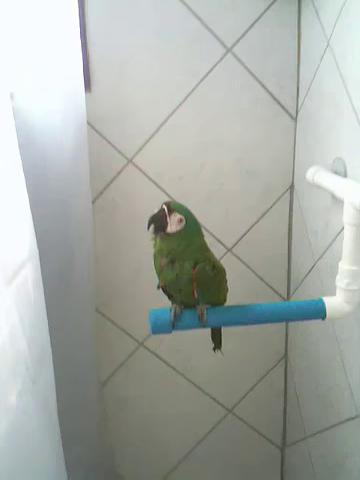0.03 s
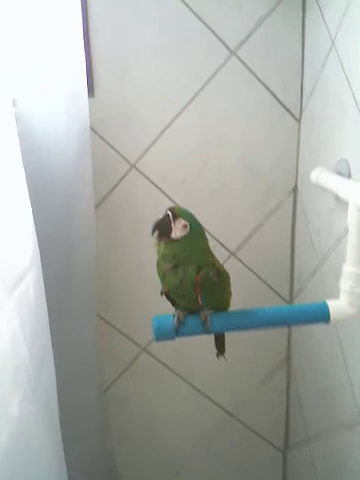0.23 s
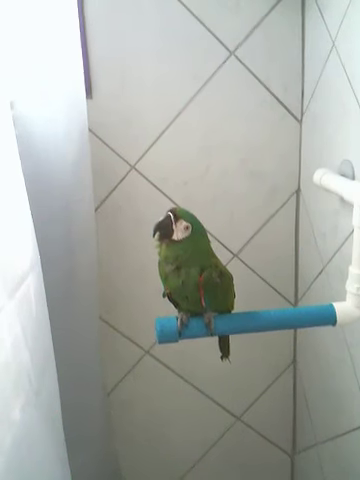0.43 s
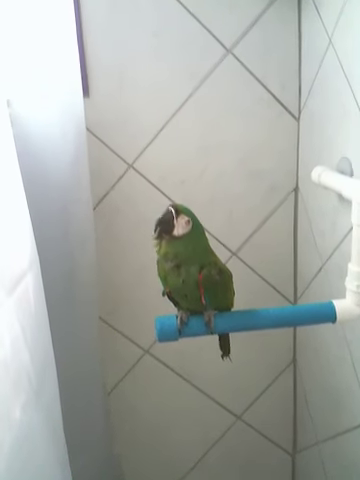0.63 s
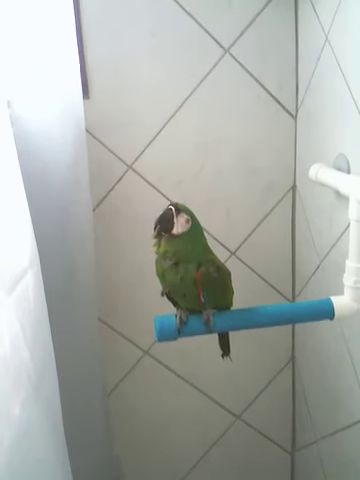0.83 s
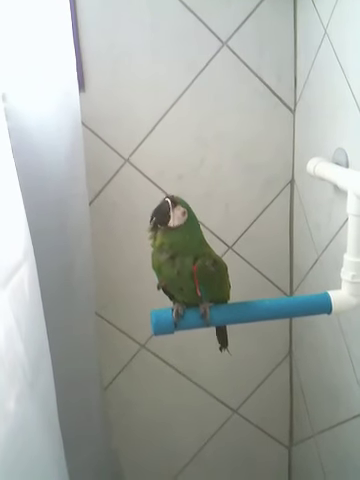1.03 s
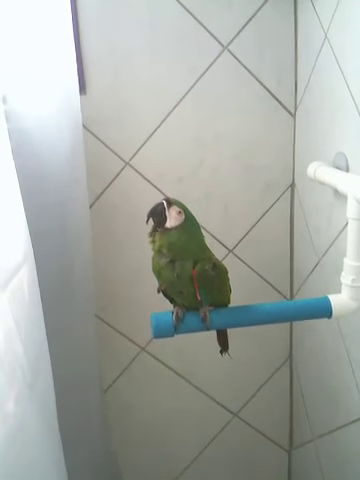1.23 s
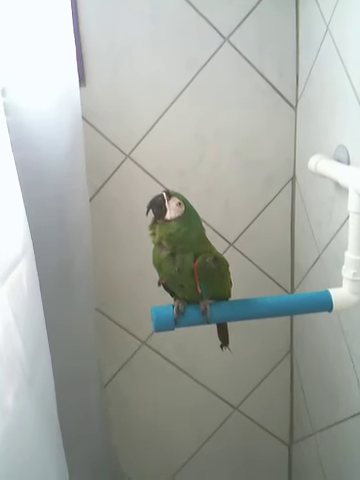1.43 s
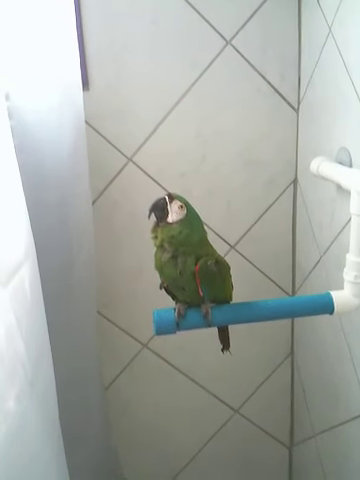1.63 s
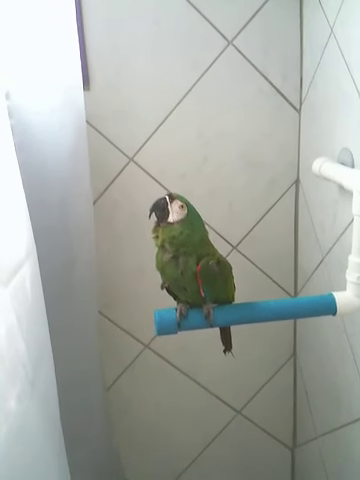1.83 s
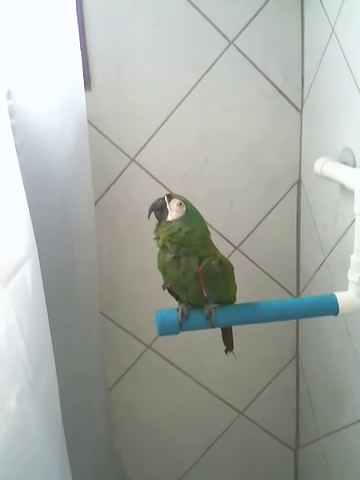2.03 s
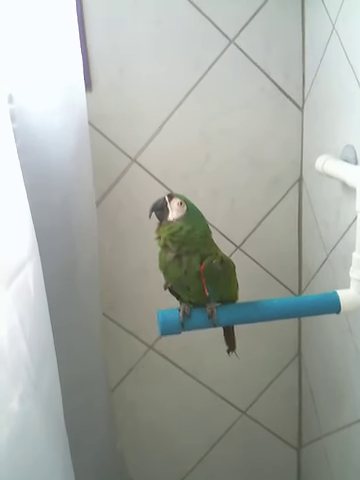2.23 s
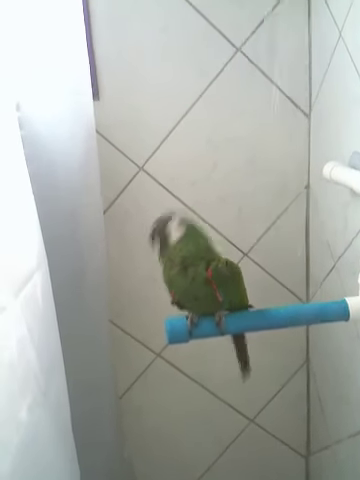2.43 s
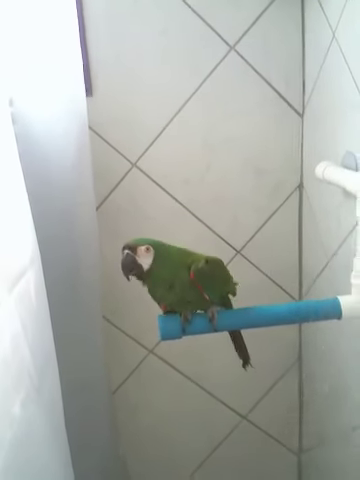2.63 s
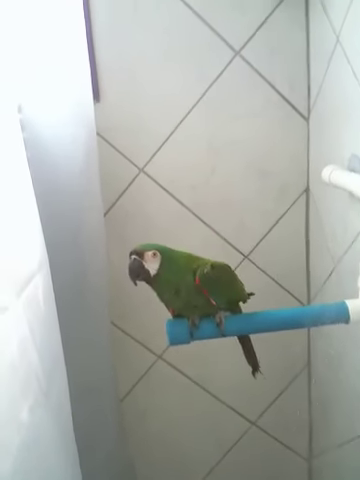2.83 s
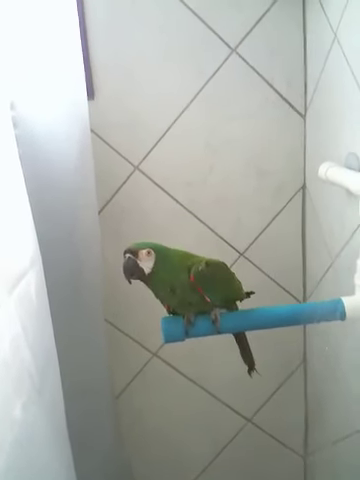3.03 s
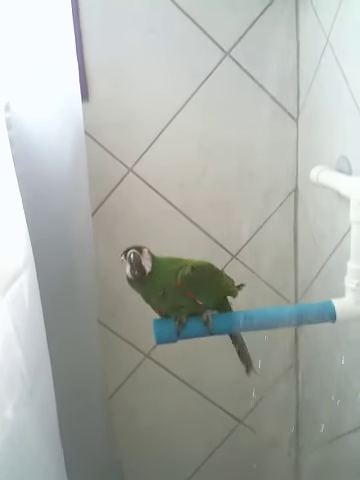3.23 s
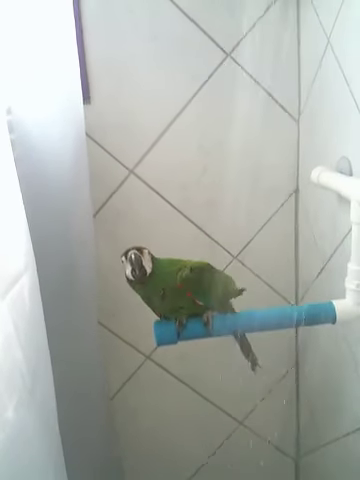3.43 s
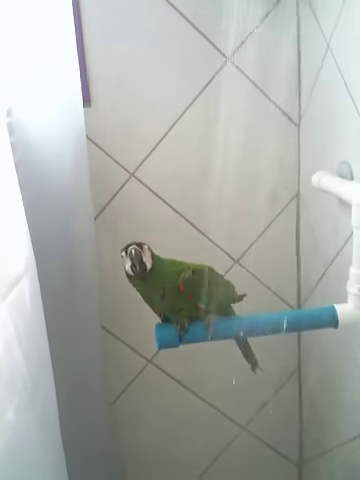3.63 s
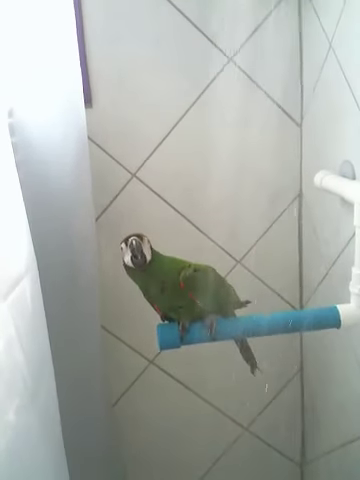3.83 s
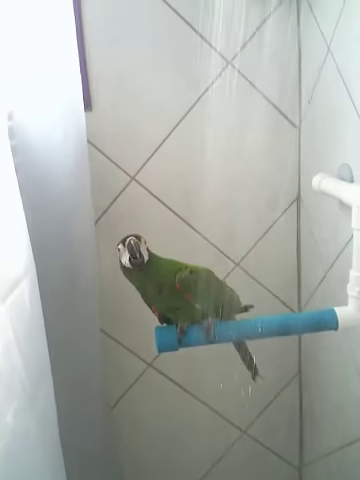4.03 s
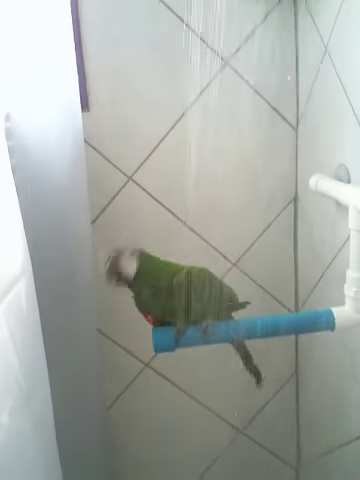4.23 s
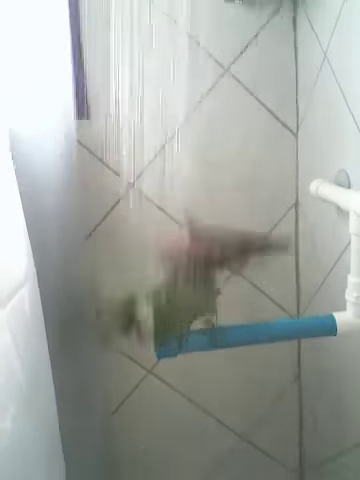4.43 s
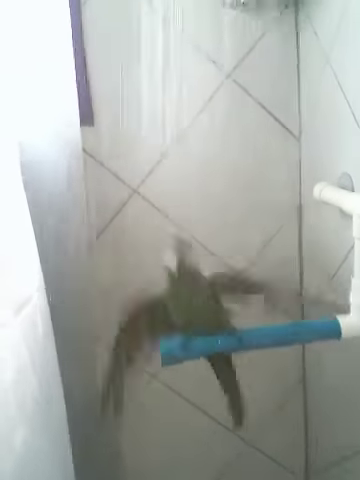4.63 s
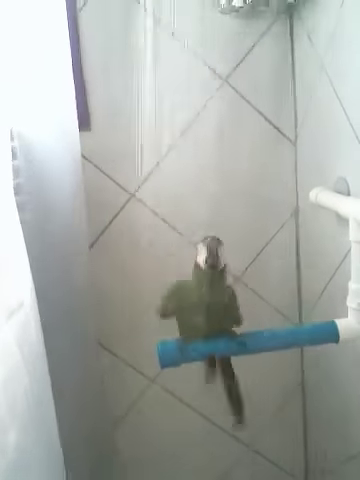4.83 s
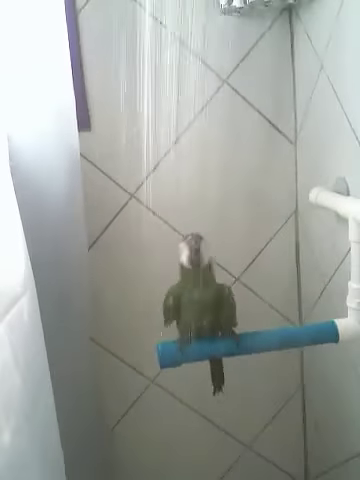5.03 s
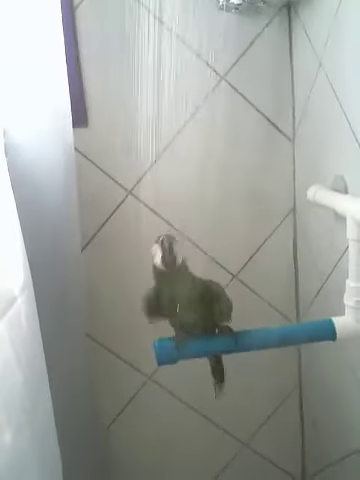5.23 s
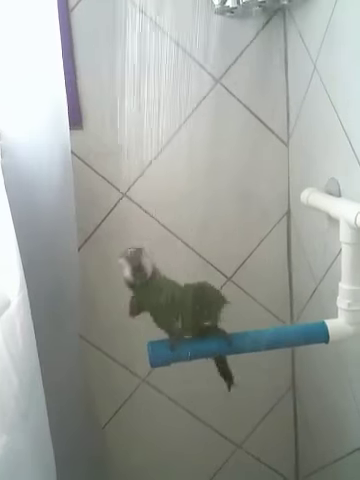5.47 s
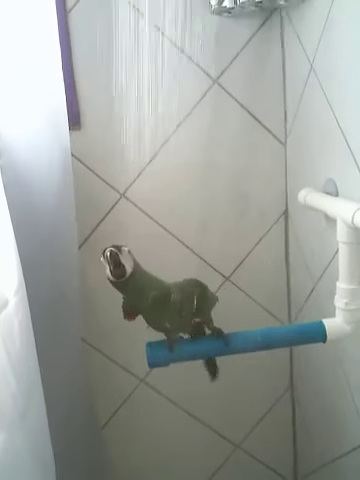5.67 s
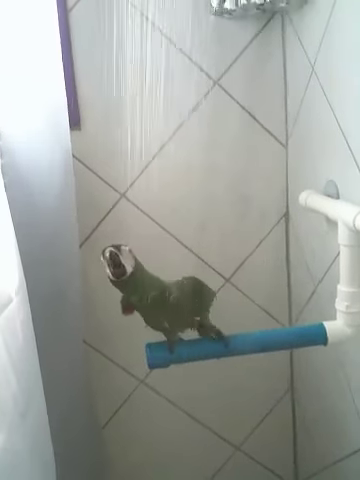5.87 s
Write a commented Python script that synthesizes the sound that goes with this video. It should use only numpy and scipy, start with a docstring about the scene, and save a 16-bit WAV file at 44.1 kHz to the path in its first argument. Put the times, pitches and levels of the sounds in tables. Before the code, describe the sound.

Steady shower spray with a gurgling drain and faint hum, broken by four loud snaps and a bird's wet wing flurry, ending softer.

```python
"""A shower runs in a small tiled bathroom: fine drops hiss, patter on the wall and gurgle in the drain, faintly humming.
The jets swing onto the near wall and patter harder, and the stiff shower head snaps as it is swivelled.
The spray lulls briefly, wet feathers swish, the head snaps twice more and a perched parrot beats its wings.
The spray turns softer as it lands on feathers instead of tiles.
Filtered random impacts make the water; decaying noise and sines make the cracks; swelling noise makes the wings."""
import sys
import numpy as np
from scipy import signal
from scipy.fft import rfft, irfft, next_fast_len
from scipy.io import wavfile

SR = 44100
rng = np.random.default_rng(int(sys.argv[2]) if len(sys.argv) > 2 else 0)


def digitize_waveform(pressure):
    """Quantize a signal to 16-bit integers and store it at the path in sys.argv[1].

    Rows of a 2-D input are taken as channels; values are limited to [-1, 1].
    """
    field = np.atleast_2d(pressure).T
    bounded = np.clip(field, -1, 1)
    quanta = np.round(bounded * 32767).astype(np.int16)
    wavfile.write(sys.argv[1], SR, quanta)


N = 260190
TIME = np.arange(N) / SR


def from_db(db):
    """Decibels to gain."""
    return 10 ** (np.asarray(db) / 20)


def rms_one(x):
    """Scale to an rms of 1."""
    return x / np.sqrt(np.mean(x ** 2) + 1e-20)


def in_time(rows):
    """Each column of a (time, value, ...) curve, sample by sample."""
    s, *columns = np.transpose(rows)
    return [np.interp(TIME, s, c) for c in columns]


def drift(rate_hz):
    """Random values, `rate_hz` a second, joined by straight lines; rms 1."""
    steps = rng.standard_normal(4096)
    return rms_one(np.interp(TIME * rate_hz, np.arange(len(steps)), steps))


def coloured(x, spectrum):
    """Causal minimum-phase filter, built from the folded cepstrum of `spectrum`; rms 1."""
    size = 2 * next_fast_len(len(x))
    hz, db = np.transpose(spectrum)
    grid_hz = np.maximum(np.arange(size // 2 + 1) * SR / size, 1)
    gain = from_db(np.interp(np.log(grid_hz), np.log(hz), db))
    cepstrum = irfft(np.log(gain))
    response = np.exp(2 * rfft(cepstrum[:size // 2], size))
    return rms_one(irfft(rfft(x, size) * response)[:len(x)])


def centred(x, start_s, shape, centre_hz):
    """Half a second of x from `start_s`, its spectrum laid around a centre; silence elsewhere."""
    out = np.zeros(N)
    first = int(start_s * SR)
    part = slice(first, first + SR // 2)
    out[part] = coloured(x[part], np.array(shape) * [centre_hz, 1])
    return out


def resonance(x, hz, width_hz):
    """A two-pole resonance of `width_hz` applied twice, for steep skirts; rms 1."""
    r = np.exp(-np.pi * width_hz / SR)
    section = [1, 0, -1, 1, -2 * r * np.cos(2 * np.pi * hz / SR), r * r]
    return rms_one(signal.sosfilt([section, section], x))


def blow(start_s, rise_s, t60_s):
    """Envelope that swells from `start_s` and dies away."""
    age_s = np.maximum(TIME - start_s, 0)
    decay = from_db(np.maximum(-60 * age_s / t60_s, -200))
    return (1 - np.exp(-age_s / rise_s)) * decay


def drops(per_s, spread_db):
    """Impacts at random moments, many small and a few large; rms 1."""
    sizes = from_db(spread_db * np.minimum(rng.exponential(1, N), 4.5))
    signs = rng.choice([-1, 1], N)
    return rms_one(sizes * signs * (rng.random(N) < per_s / SR))


ROOM_T60_S = 0.53


def bathroom(x, wet_db):
    """Direct sound plus half a second of decaying noise as reflections between the tiles; rms 1."""
    tail = (rng.standard_normal(N) * blow(0.00077, 0.00068, ROOM_T60_S))[:SR // 2]
    reflections = signal.fftconvolve(x, tail / np.linalg.norm(tail))[:N]
    return rms_one(x + from_db(wet_db) * reflections)


# spectra of spray, of drops on wet tiles and of jets on the bird: (frequency [Hz], level per Hz [dB])
HISS_SPECTRUM = [(80, -78), (500, -59), (1200, -21), (2500, -14), (4000, -8.5), (5500, -5), (7000, -2.04),
                 (8400, -1.5), (10500, -5.5), (13000, -8.5), (16000, -15)]
PATTER_SPECTRUM = [(60, -21), (300, -31), (600, -47), (950, -1), (1350, 2.5), (2000, 1.5), (3000, 6.5),
                   (4500, 1.5), (9000, -31)]
DRUMMING_SPECTRUM = [(200, -20), (480, 0.5), (900, -4), (2000, -7), (4000, -21)]
# aim of the jets: (time [s], share landing on the bird [1 = all; ends slightly above])
ON_BIRD = [(2.82, 0), (2.94, 0.12), (3.1, 0), (3.33, 0), (3.43, 0.2), (3.67, 0.13), (4.05, 0.2),
           (4.25, 0.26), (4.7, 0.31), (4.88, 0.66), (5.02, 0.99), (5.22, 0.9), (5.45, 0.85), (5.75, 1),
           (5.88, 1.08)]
# hollowing of the mid band: (time [s], share taken out [0-1])
HOLLOW = [(2.7, 0), (2.78, .45), (2.85, 0.1), (4.95, 0), (5.09, 0.4), (5.16, .3), (5.24, .95), (5.33, 0.35),
          (5.6, .25), (5.85, 0)]
HISS_DB, PATTER_DB = -26, -46.5   # all jets on the tiles
FEATHER_HISS_LOSS_DB, FEATHER_PATTER_LOSS_DB, DRUMMING_DB = 11, 15, -54.5   # all jets on the bird
SWING_START_S, SWING_END_S, WALL_GAIN_DB = 1.3, 2.43, 6.5   # jets swing onto the near wall
LULL_S, LULL_FADE_S, LULL_RETURN_S = 2.766, 0.11, 0.076   # spray falls away while the head is turned
LULL_HISS_LOSS_DB, LULL_PATTER_LOSS_DB = 6.5, 14
LULL_PATTER_LAG_S = 0.018   # heavy drops lag
HOLLOW_LOW_HZ, HOLLOW_HIGH_HZ = 1950, 3100


def spray(flutter_db=0.5, bird_flutter_db=0.1, plink_db=-5.0, spatter_db=3.5):
    """Fine drops hiss; heavier ones patter and plink on wet tiles, and drum dully on feathers."""
    on_bird, = in_time(ON_BIRD)
    hollow, = in_time(HOLLOW)
    on_wall = np.interp(TIME, [SWING_START_S, SWING_END_S], [0, 1])
    lull = np.interp(TIME - LULL_S, [-LULL_FADE_S, 0, LULL_RETURN_S], [0, 1, 0])
    late_lull = np.interp(TIME - LULL_PATTER_LAG_S, TIME, lull)

    hiss_db = HISS_DB - FEATHER_HISS_LOSS_DB * on_bird - LULL_HISS_LOSS_DB * lull
    patter_db = PATTER_DB + WALL_GAIN_DB * on_wall
    patter_db = patter_db - FEATHER_PATTER_LOSS_DB * on_bird - LULL_PATTER_LOSS_DB * late_lull

    hiss = bathroom(coloured(drops(11000, 2.3), HISS_SPECTRUM), wet_db=-12.0)
    spatter = from_db(spatter_db * drift(23.98)) * drops(1500, 3.0)
    patter = bathroom(coloured(spatter, PATTER_SPECTRUM), wet_db=-3)
    patter = rms_one(patter + from_db(plink_db) * plinks(per_s=450, cycles=16.4, clump_db=2.5))
    drumming = coloured(drops(900, 4.3), DRUMMING_SPECTRUM)

    # the hiss level flutters slightly, a touch more on the bird
    flutter = (flutter_db + bird_flutter_db * on_bird ** 2) * drift(30)
    out = from_db(hiss_db + flutter) * hiss + from_db(patter_db) * patter
    out += from_db(DRUMMING_DB) * on_bird * drumming
    band = signal.butter(1, [HOLLOW_LOW_HZ, HOLLOW_HIGH_HZ], "band", fs=SR, output="sos")
    return out - np.clip(hollow, 0, 1) * signal.sosfilt(band, out)


def plinks(per_s, cycles, clump_db, count=16):
    """Drops trap bubbles in the water film; they clump and ring at one of `count` pitches; rms 1."""
    pitches_hz = np.geomspace(1150, 2300, count) * np.exp(rng.normal(0, 0.023, count))
    clumps = from_db(clump_db * drift(35))
    rings = (resonance(clumps * drops(per_s / count, 2.0), hz, hz / cycles) for hz in pitches_hz)
    return rms_one(sum(rings))


# low wash of water on the floor: (frequency [Hz], level per Hz [dB])
WASH_SPECTRUM = [(25, -65), (80, -16), (110, -18.5), (140, 3), (185, -0.5), (220, -7.5), (270, -1.5),
                 (380, 3.5), (470, -5), (620, -2.5), (1000, -2), (1600, -4.5), (3000, -12.5)]
# the two drain resonances: (time [s], low level [dB], high level [dB])
DRAIN_LEVELS = [(.05, -46, -48.5), (.28, -49.5, -57), (.55, -54, -53.5), (1.45, -60, -57.5),
                (1.7, -53, -53.5), (2.12, -51.5, -56), (2.5, -55.5, -57), (3.3, -55, -56.5),
                (4.65, -58.5, -60), (4.85, -57, -49), (5.24, -59, -55), (5.33, -65, -63),
                (5.42, -60, -54.5), (5.85, -57.5, -51.5)]
# single glugs and plops, most at the drain's pitches, a few from big drops shaken off the wings:
# (time [s], pitch [Hz], level [dB])
GLUGS_AND_PLOPS = [(.125, 737, -31), (0.136, 286, -32), (.188, 730, -28), (0.389, 290, -35),
                   (.52, 300, -37), (.668, 736, -24.5), (1.211, 295, -31), (1.84, 750, -37),
                   (2.609, 288, -34), (2.755, 738, -31.5), (3.44, 730, -34), (4.687, 892, -28),
                   (4.7, 504, -33), (4.718, 418, -32.5), (4.845, 786, -36), (4.98, 698, -35),
                   (5.106, 723, -31), (5.228, 715, -33), (5.68, 730, -27), (5.775, 717, -30)]
WASH_DB = -48
DRAIN_LOW_HZ, DRAIN_HIGH_HZ = 289.5, 733
HUM_DB = 0.5   # median of the hum, re the churning part before joint scaling
DRAIN_WAVER = 0.0176   # relative rms pitch swing of the high resonance


def drain(lumpy_db=2.5, hum_waver_hz=3.64, hum_swing_db=2.0):
    """Run-off washes over the floor and stirs two wavering hollow resonances; glugs and plops ring as sines."""
    low_db, high_db = in_time(DRAIN_LEVELS)
    out = from_db(WASH_DB) * coloured(drops(2500, 2.5), WASH_SPECTRUM)

    turns = np.cumsum(DRAIN_LOW_HZ + hum_waver_hz * drift(14)) / SR
    hum = np.sqrt(2) * from_db(HUM_DB + hum_swing_db * drift(9)) * np.sin(2 * np.pi * turns)
    churn = resonance(drops(600, 2.7), DRAIN_LOW_HZ, width_hz=29)
    out += from_db(low_db) * rms_one(hum + churn)

    gurgle = resonance(drops(600, 2.2), DRAIN_HIGH_HZ, width_hz=60)
    warped_s = TIME + np.cumsum(DRAIN_WAVER * drift(8.1)) / SR
    wavering = np.interp(warped_s, TIME, gurgle)
    out += from_db(high_db + lumpy_db * drift(16)) * wavering

    for s, hz, db in GLUGS_AND_PLOPS:
        out += from_db(db) * blow(s, 0.0095, 0.1) * np.sin(2 * np.pi * hz * (TIME - s))
    return out


# slips of the joint: (time [s], snap [dB], snap centre [Hz], room ringing [dB],
# plastic shell clack [dB], metal joint ping [dB], bass change [dB])
CRACKS = [(2.2076, 2, 6460, -15.5, -33, -25, -2), (2.244, 0, 6560, -13.5, -20.5, -20, -4),
          (4.0953, -2, 7100, -15, -24, -40, -1), (4.3334, -0.5, 7400, -16, -22.5, -22, 0.5)]
# spectrum of a snap: (multiple of the centre [1], level per Hz [dB])
SNAP_SHAPE = [(.008, -51), (.03, -16), (.18, -13), (.46, -8), (.75, -0.5), (1, 1.5), (1.4, -3.5),
              (2.3, -18.5)]
# spectrum of the room tail: (frequency [Hz], level per Hz [dB])
CRACK_SPECTRUM = [(40, -35), (100, -22), (135, 5), (212, -3), (250, 6.5), (330, 3), (410, -0.5),
                  (700, -3.5), (900, 1.5), (1030, 2), (1130, -2), (1250, -6), (1800, 4), (2200, -2),
                  (3300, 0.5), (6400, 6.5), (8500, 4.5), (15500, -8)]
# modes ringing with each crack: (frequency [Hz], level re room ringing [dB], t60 [s])
HEAD_MODES = [(141, -12.5, 0.25), (184.5, -20.5, 0.32), (281, -21, 0.28), (322, -20, .22),
              (467.5, -21, 0.37), (876, -18.5, 0.25), (1007, -23, 0.61), (1226, -21, 0.35),
              (1380, -17, 0.35), (1470, -21, 0.35), (1580, -25, 0.28), (1809, -21, .2), (2372, -10, 0.13),
              (2570, -15, 0.13), (2690, -11, 0.14), (3920, -20, .2), (4800, -23, 0.18), (5690, -18, 0.17)]
# the joint stutters on after a loud crack: (time [s], snap [dB])
STUTTERS = [(2.2152, -12), (2.2232, -11), (2.234, -12), (2.24, -11), (2.2622, -12), (4.1018, -10.5)]
SLAP_S, SLAP_DB = 0.0051, -11   # snap off the nearest wall
SHELL_HZ, JOINT_HZ, JOINT_WIDTH_HZ = 1397, 6240, 260
KNOCK_DB, KNOCK_HZ, KNOCK_T60_S = -14.5, 1600, 0.029   # hard, woody front
BASS_BELOW_HZ = 990


def shower_head(snap_t60_s=0.012, tail_t60_s=0.33, clack_t60_s=0.2, ping_t60_s=0.24, stutter_t60_s=0.013):
    """The stiff joint slips with short snaps that set the metal, shell, pipe and room ringing."""
    out = np.zeros(N)
    slip = rng.standard_normal(N)
    tail = coloured(drops(4500, 1.5), CRACK_SPECTRUM)   # separate reflections off the tiles
    clack = resonance(rng.standard_normal(N), SHELL_HZ, width_hz=400)
    knock = resonance(rng.standard_normal(N), KNOCK_HZ, width_hz=1660)
    ping = resonance(rng.standard_normal(N), JOINT_HZ, JOINT_WIDTH_HZ)
    bass = signal.butter(1, BASS_BELOW_HZ, fs=SR, output="sos")
    for s, snap_db, centre_hz, ring_db, clack_db, ping_db, bass_db in CRACKS:
        snap = centred(slip, s, SNAP_SHAPE, centre_hz)
        crack = from_db(snap_db) * blow(s, 0.0001, snap_t60_s) * snap
        crack += from_db(SLAP_DB) * np.interp(TIME - SLAP_S, TIME, crack)
        crack += from_db(ring_db) * blow(s, 0.00036, tail_t60_s) * tail
        crack += from_db(clack_db) * blow(s, 0.0023, clack_t60_s) * clack
        crack += from_db(KNOCK_DB) * blow(s, 0.0005, KNOCK_T60_S) * knock
        crack += from_db(ping_db) * blow(s, 0.0004, ping_t60_s) * ping
        for hz, db, t60_s in HEAD_MODES:
            mode = np.sin(2 * np.pi * hz * (TIME - s))
            crack += from_db(ring_db + db) * blow(s, 0.0036, t60_s) * mode
        out += crack + (from_db(bass_db) - 1) * signal.sosfilt(bass, crack)
    for s, db in STUTTERS:
        snap = centred(slip, s, SNAP_SHAPE, JOINT_HZ)
        out += from_db(db) * blow(s, 0.0001, stutter_t60_s) * snap
    return out


# wing beats, shakes of wet feathers, sudden splashes:
# (time [s], level [dB], centre [Hz], swell [s], t60 [s])
SWISHES = [(2.489, -25, 6040, 0.022, 0.45), (2.794, -19, 7800, 0.0076, 0.21),
           (3.057, -15, 8800, .003, 0.052), (4.455, -20.5, 8460, 0.013, 0.17),
           (4.493, -14, 7800, 0.011, 0.29), (4.728, -22.5, 7200, .015, 0.19),
           (5.04, -26.5, 6700, 0.045, 0.36), (5.143, -26.5, 6800, 0.011, 0.14),
           (5.258, -25.5, 8300, .015, .16), (5.334, -25.5, 7700, .009, 0.16),
           (5.405, -25, 8340, 0.0083, 0.13), (5.535, -26.5, 6400, .014, 0.16), (5.62, -30, 8200, .015, .22),
           (5.688, -19.5, 7400, 0.035, 0.29), (5.795, -29, 8900, .01, 0.12)]
# spectrum of a swish: (multiple of the centre [1], level per Hz [dB])
SWISH_SHAPE = [(.01, -60), (.15, -23), (.45, -15.5), (.74, -10), (1, 2), (1.25, 1), (1.8, -12)]
# air pushed by the wings: (time [s], level [dB], t60 [s])
PUFFS = [(4.489, -29, 0.33), (4.552, -40.5, 0.23), (4.615, -43, 0.28), (4.692, -36, 0.28)]
# spectrum of that air: (frequency [Hz], level per Hz [dB])
AIR_SPECTRUM = [(25, -50), (90, -16), (150, 1.5), (230, -11), (380, -4), (650, -5), (1000, -3),
                (1600, -8.5), (3200, -12), (6000, -20)]
SWISH_SAG, SWISH_SAG_S = 0.83, 0.1   # heavier drops land later: centre sinks to this share in this time


def wings():
    """Feathers fling off drops in a sinking swish; a wing beat also pushes a puff of air."""
    air = coloured(rng.standard_normal(N), AIR_SPECTRUM)
    out = sum(from_db(db) * blow(s, 0.0085, t60_s) * air for s, db, t60_s in PUFFS)
    fine = bathroom(drops(5000, 1.1), wet_db=9.0)
    heavy = bathroom(drops(5000, 1.1), wet_db=9.0)
    for s, db, centre_hz, swell_s, t60_s in SWISHES:
        late = np.clip((TIME - s) / SWISH_SAG_S, 0, 1)
        swish = np.sqrt(1 - late) * centred(fine, s, SWISH_SHAPE, centre_hz)
        swish += np.sqrt(late) * centred(heavy, s, SWISH_SHAPE, SWISH_SAG * centre_hz)
        out += from_db(db) * blow(s, swell_s, t60_s) * swish
    return out


def scene():
    """Everything reaches one microphone, the same on both sides."""
    return np.tile(spray() + drain() + shower_head() + wings(), (2, 1))


START_S, CEILING, CUTOFF_HZ = 0.036, 0.64, 15750


def record(dry):
    """The recorder opens, overloads on the loudest peaks, thins the deep bass and cuts the top."""
    rounded = CEILING * np.tanh(dry * (TIME > START_S) / CEILING)
    thinned = signal.sosfilt(signal.butter(2, 85, "high", fs=SR, output="sos"), rounded)
    top_cut = signal.ellip(10, 0.05, 60, CUTOFF_HZ, fs=SR, output="sos")
    return signal.sosfiltfilt(top_cut, thinned)


dry = scene()
out = record(dry)
digitize_waveform(out)
```